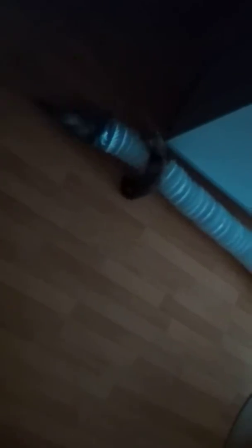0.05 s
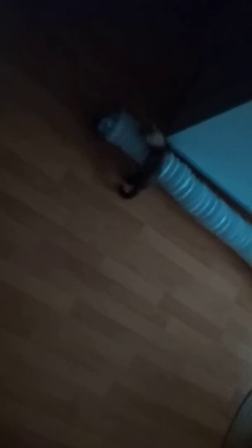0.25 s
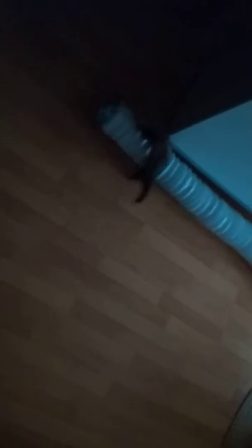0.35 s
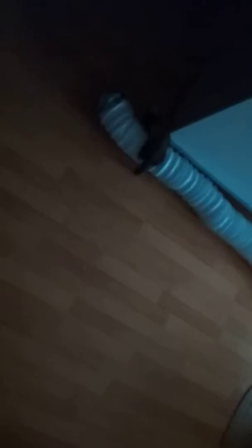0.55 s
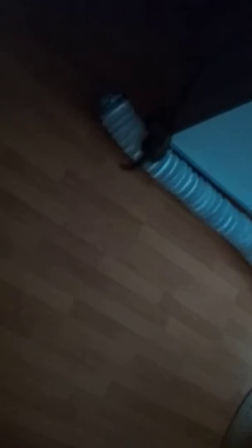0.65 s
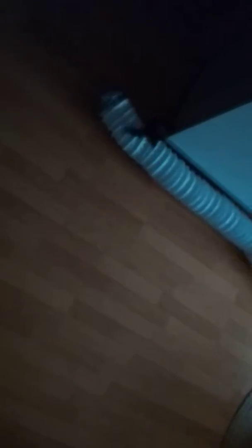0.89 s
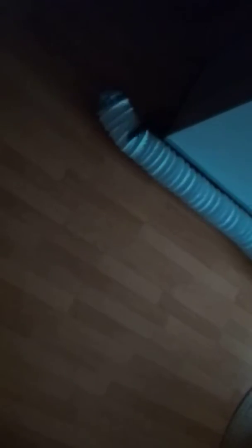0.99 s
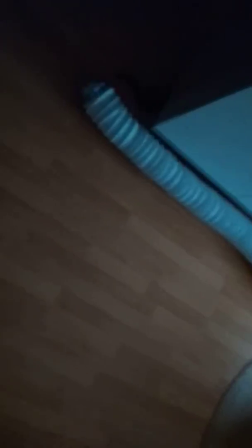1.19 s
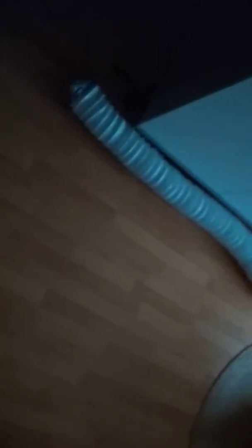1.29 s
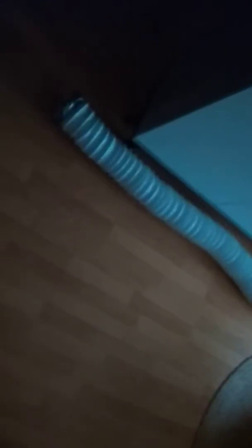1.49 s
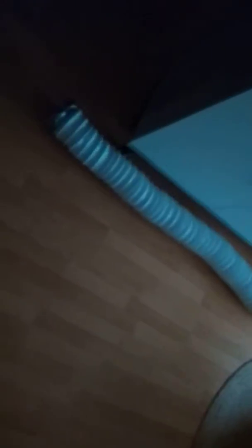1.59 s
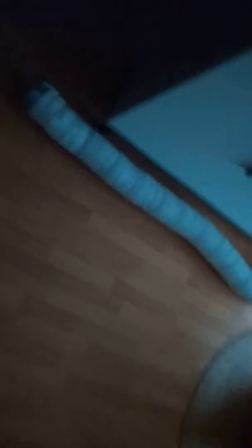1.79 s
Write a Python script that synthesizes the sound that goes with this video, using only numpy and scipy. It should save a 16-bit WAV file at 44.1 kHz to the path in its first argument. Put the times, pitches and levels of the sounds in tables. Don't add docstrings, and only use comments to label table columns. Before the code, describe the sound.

Ferret scrambling inside a flexible plastic tube, hollow knocks and crinkles fading down its length

```python
import sys
import numpy as np
from scipy import signal
from scipy.fft import rfft, irfft, next_fast_len
from scipy.io import wavfile
from scipy.ndimage import uniform_filter1d

SR = 44100
rng = np.random.default_rng(int(sys.argv[2]) if len(sys.argv) > 2 else 0)


def wrap_up_sound(samples):
    columns = np.atleast_2d(samples).T
    tamed = np.clip(columns, -1, 1)
    steps = np.round(tamed * 32767).astype(np.int16)
    wavfile.write(sys.argv[1], SR, steps)


def natural_amplitude(level_db):
    exponent = np.asarray(level_db, float) / 20
    return 10 ** exponent


N = 81585

# t/s, wall crinkle level/dB, tube scuff level/dB, weight on boards level/dB
GALLOP = [(0.0, -94, -88, -90), (.05, -56, -71, -90), (0.117, -57, -83, -90), (0.164, -96, -76, -96),
          (0.242, -98, -47.5, -71), (0.304, -48, -59.5, -52), (0.41, -53, -48, -82),
          (0.556, -51, -49.5, -64), (0.69, -48.5, -48, -52), (.79, -54.5, -49.5, -56),
          (0.844, -56.5, -55, -40), (1.07, -55, -55, -52.5), (1.272, -57.5, -62.5, -68),
          (1.386, -63, -60, -74), (1.468, -62, -81, -100), (1.602, -60.5, -70, -99),
          (1.74, -68.5, -91, -100), (1.85, -113, -96, -101)]


def rms_one(x):
    return x / np.sqrt(np.mean(x ** 2) + 1e-30)


def at_hz(points, hz):
    f, value = np.transpose(points)
    return np.interp(np.log(np.maximum(hz, 1)), np.log(f), value)


def filtered(x, order, hz, kind):
    return signal.sosfilt(signal.butter(order, hz, kind, fs=SR, output="sos"), x)


def colour(x, spectrum):
    size = 4096
    hz = np.arange(size // 2 + 1) * SR / size
    falling_bass = (1, spectrum[0][1] - 60)
    log_gain = at_hz([falling_bass] + list(spectrum), hz) * np.log(10) / 20
    cepstrum = irfft(log_gain)
    cepstrum[1:size // 2] *= 2
    cepstrum[size // 2 + 1:] = 0
    response = irfft(np.exp(rfft(cepstrum)))
    response = response / np.sqrt(np.sum(response ** 2))
    response = response.reshape((1,) * (x.ndim - 1) + (-1,))
    return signal.fftconvolve(x, response, axes=-1)[..., :N]


def ports(size, gain_of_band):
    # f/Hz, likeness (0-1)
    likeness = [(60, 0.97), (250, 0.83), (500, 0.8), (1000, 0.1), (12000, 0.0077)]
    hz = np.arange(size // 2 + 1) * SR / size
    alike = at_hz(likeness, hz)
    mid, side = rfft(rng.standard_normal((2, size)))
    pair = (np.sqrt(1 + alike) * mid + np.sqrt(1 - alike) * side * [[1], [-1]]) / np.sqrt(2)
    out = 0
    for centre in 2 ** np.arange(4, 15.1, 0.5):
        share = np.clip(1 - 2 * np.abs(np.log2(np.maximum(hz, 16) / centre)), 0, 1)
        out = out + irfft(pair * share, size) * gain_of_band(centre)
    return out


def grains(per_s, spread_db, level_db):
    size = natural_amplitude(spread_db * np.minimum(rng.exponential(1, N), 4)) * rng.choice([-1, 1], N)
    happens = rng.random(N) < per_s / SR
    return natural_amplitude(level_db) * rms_one(size * happens)


def swell(turns):
    return np.e * turns * np.exp(-turns)


def ring(hz, cycles, size):
    t = np.arange(size) / SR
    return np.sin(2 * np.pi * hz * t) * swell(t * hz * 9 / np.clip(cycles, 2, 60))


def even(burst):
    spectrum = rfft(burst)
    flat = irfft(spectrum / (uniform_filter1d(np.abs(spectrum), size=50) + 1e-12), len(burst))
    return rms_one(flat) * np.sqrt(np.mean(burst ** 2))


def add(out, s, sound):
    i = int(s * SR)
    out[i:i + len(sound)] += sound[:len(out) - i]


def gallop_level(column):
    table = np.transpose(GALLOP)
    return np.interp(np.arange(N) / SR, table[0], table[column])


def air():
    # f/Hz, level/dB
    hush = [(40, -13), (200, -44.5), (480, -11), (800, -23.5), (2200, -18.5), (5500, -31.5), (9500, -19.5),
            (16000, -30)]
    noise = ports(next_fast_len(N + 1) * 2, lambda hz: 1)[:, :N]
    return natural_amplitude(-71.5) * colour(noise, hush)


def room(x):
    # f/Hz, time/s
    dying_time = [(100, 0.26), (500, 0.39), (2000, 0.31), (8000, 0.27), (15000, 0.25)]
    places, size = 10, 20000
    echo_db, left_db = 6, 0.17
    first_echo_s, build_s = 0.0022, 0.004
    port_lag_s, bounce_s, bounce_db = 0.00029, 0.00083, -3
    t = np.arange(size) / SR
    position = np.arange(N) / N * (places - 1)

    def decay(hz):
        t60 = at_hz(dying_time, hz)
        return natural_amplitude(-60 * t / t60) / np.sqrt(t60)

    out = 0
    for k in range(places):
        tail = ports(size, decay) * (1 - np.exp(-np.maximum(t - first_echo_s, 0) / build_s))
        tail = natural_amplitude(echo_db) * rms_one(tail) / np.sqrt(size)
        lag = (rng.random(2) * port_lag_s * SR).astype(int)
        bounce = (rng.random(2) * bounce_s * SR).astype(int) + 5
        tail[[0, 1], lag] += 1
        tail[[0, 1], lag + bounce] += natural_amplitude(bounce_db)
        here = np.cos(np.pi / 2 * np.clip(position - k, -1, 1))
        out = out + signal.fftconvolve(x[None] * here, tail, axes=1)[:, :N]
    balance = natural_amplitude(left_db * np.array([[1], [-1]]))
    return out * balance / np.sqrt(1 + natural_amplitude(2 * echo_db))


def far_scuff():
    # t/s, level/dB
    far = [
        (1.36, -78),
        (1.44, -59),
        (1.55, -81),
        (1.66, -66),
        (1.76, -64.5),
        (1.85, -96),
    ]
    # f/Hz, level/dB
    pipe = [(500, -23), (780, -3.5), (1100, -49), (1500, 2.5), (1900, -18), (3300, -15.5), (4500, -14.5)]
    s, db = np.transpose(far)
    return colour(grains(900, 3.3, np.interp(np.arange(N) / SR, s, db)), pipe)


def weight():
    # f/Hz, level/dB
    boards = [(25, -24), (55, -12), (80, -19), (105, -4), (150, 0), (230, -2), (400, -12), (1000, -40)]
    return colour(grains(620, 4.4, gallop_level(3) - 10), boards)


def drag():
    # f/Hz, level/dB
    body = [(150, -48.5), (260, -18), (360, 7), (550, -5), (800, 1.5), (1100, -5), (2000, -9),
            (4000, -47.5)]
    return colour(grains(250, 5.0, gallop_level(2) - 0.5), body)


def panels(clicks):
    count, sharpness, swing_db, share = 14, 7.4, 4, 0.63
    dealt = rng.integers(0, count, N)
    out = 0
    for k, hz in enumerate(np.geomspace(1570, 15000, count)):
        bend = np.interp(np.arange(N) / N * 59, np.arange(60), rng.standard_normal(60))
        hits = clicks * natural_amplitude(swing_db * bend) * (dealt == k)
        out = out + signal.lfilter(*signal.iirpeak(hz, sharpness, fs=SR), hits + 1e-18)
    ringing = rms_one(out) * np.sqrt(np.mean(clicks ** 2))
    return np.sqrt(1 - share) * clicks + np.sqrt(share) * ringing


def crinkles():
    # f/Hz, level/dB
    wall = [(530, -34.5), (900, -1), (2190, -13.5), (4150, -15), (4520, -15.5), (5350, -15), (6640, -13.5),
            (11400, -5), (16000, -18.5)]
    return colour(panels(grains(1600, 5, gallop_level(1) - 1.5)), wall)


def paws():
    # t/s, peak level/dB, f/Hz
    landings = [(0.068, -50.5, 218), (0.071, -46.5, 330), (.09, -43, 310), (0.107, -48, 332),
                (0.188, -43.5, 187), (0.201, -43.5, 287), (0.222, -36.5, 362), (0.239, -43.5, 164),
                (.308, -38.5, 320), (0.371, -45, 139), (0.381, -34.5, 311), (0.405, -45, 158),
                (0.45, -40, 130), (0.48, -35.5, 192), (.519, -31.5, 293), (0.541, -40, 385),
                (0.581, -40, 168), (.61, -41.5, 243), (0.67, -41, 205), (0.737, -47, 212),
                (0.792, -36.5, 327), (.839, -34.5, 349), (0.884, -37.5, 157), (0.917, -43.5, 143),
                (0.986, -41, 148), (1.006, -33.5, 337), (1.027, -43, 191), (1.06, -63, 161),
                (1.154, -43, 254), (1.187, -48.5, 173), (1.358, -41, 364), (1.362, -51.5, 252),
                (1.405, -43, 381), (1.45, -56, 370), (1.42, -45, 430), (1.491, -50.5, 420),
                (1.565, -53, 330)]
    cycles, overtone, overtone_db = 7.5, 1.45, -11
    out = np.zeros(N)
    for s, db, hz in landings:
        thump = ring(hz, cycles, 6000) + natural_amplitude(overtone_db) * ring(hz * overtone, cycles, 6000)
        add(out, s, natural_amplitude(db - 4) * filtered(thump, 3, 0.6 * hz, "high"))
    return out


def knocks():
    # t/s, peak level/dB, f/Hz, ring length/cycles, crack level/dB
    hits = [(.044, -61, 2330, 12, -71), (.045, -65.5, 910, 38, -80), (.066, -60, 996, 28, -78),
            (.069, -54.5, 1570, 68, -49.5), (.082, -65.5, 554, 28, -77), (.09, -63, 820, 31, -80),
            (.187, -57, 1670, 7.3, -39), (.232, -43, 790, 8.4, -65), (.25, -44, 580, 8.4, -75),
            (.309, -49.5, 616, 41, -58), (.363, -39, 555, 4.4, -35.5), (.431, -46, 544, 21, -39),
            (.483, -31, 880, 6.9, -53), (.531, -29, 548, 5.3, -34.5), (.516, -36, 476, 4, -54),
            (.572, -39.5, 820, 6.2, -71), (.676, -30, 1660, 3.1, -36.5), (.75, -39.5, 890, 4.3, -38),
            (.841, -31, 534, 3.1, -50), (.992, -36.5, 565, 3.8, -58), (1.093, -47, 530, 7.2, -39),
            (1.153, -38.5, 794, 4.4, -64), (1.304, -49, 610, 13.4, -32.5), (1.305, -52, 915, 9.3, -80),
            (1.32, -54, 1840, 9.3, -43), (1.352, -42, 540, 9, -80), (1.354, -39.5, 780, 13, -40),
            (1.37, -48, 756, 13, -68), (1.479, -44.5, 790, 16.6, -59), (1.496, -53, 436, 11, -82),
            (1.543, -41.5, 780, 10, -35.5), (1.647, -70, 740, 6.4, -48.5), (1.782, -53, 930, 29, -54.5),
            (1.784, -55, 784, 26, -73), (1.783, -51, 1440, 11.6, -80)]
    out, crack = np.zeros(N), np.zeros(N)
    crack_fade = np.exp(-np.arange(3000) / SR / 0.0063)
    for s, db, hz, cycles, crack_db in hits:
        add(out, s, natural_amplitude(db - 1) * ring(hz, cycles, 3000))
        add(crack, s, natural_amplitude(crack_db - 0.5) * even(rng.standard_normal(3000) * crack_fade))
    return out + filtered(crack, 3, [1150, 2500], "band")


def snaps():
    # t/s, peak level/dB, length/ms
    springs = [(.047, -48.5, 15), (0.161, -53.5, 10), (.195, -46.5, 4.6), (0.223, -37.5, 2.8),
               (0.236, -30.5, 0.7), (0.371, -41, 3), (0.4306, -30, 0.5), (0.4321, -31, 0.44),
               (0.4419, -55, 0.56), (0.476, -41.5, 4.5), (.512, -35.5, 3.5), (0.669, -42.5, 5.7),
               (0.712, -45, 0.34), (0.794, -44, 5), (0.8401, -25.5, 0.57), (0.8434, -36.5, 0.83),
               (0.963, -42.5, 4.8), (0.9713, -36.5, .8), (0.992, -31.5, 0.78), (1.092, -48.5, 12),
               (1.147, -39, 6), (1.316, -47.5, 3.4), (1.3517, -27, 0.78), (1.3566, -27.5, 0.7),
               (1.364, -38.5, 1.75), (1.524, -47.5, 1.5), (1.5426, -34.5, 1.6), (1.555, -61, 1.7),
               (1.729, -57.5, 1.1)]
    # f/Hz, level/dB
    rib = [(600, -35), (1000, -2), (2400, -10), (4300, -16.5), (5600, -14.5), (7300, -12.5), (10800, -5),
           (16000, -17)]
    out, t = np.zeros(N), np.arange(3000) / SR
    for s, db, ms in springs:
        shape = swell(1000 * t / np.clip(ms, 0.1, 10))
        add(out, s, natural_amplitude(db - 2) * even(rng.standard_normal(3000) * shape))
    return colour(filtered(out, 1, 1490, "high"), rib)


def scene():
    rubbing = far_scuff() + weight() + drag() + crinkles()
    striking = paws() + knocks() + snaps()
    return air() + room(rubbing + natural_amplitude(3.0) * striking)


def low_pass(x):
    return signal.sosfilt(signal.butter(12, 16640, fs=SR, output="sos"), x)


def record(dry):
    # f/Hz, width/Hz, depth (0-1)
    dips = [(1114, 126, 0.41), (4506, 550, 0.36), (7345, 570, 0.52), (8340, 360, 0.87), (13200, 420, .4)]
    x = filtered(dry, 2, 23.3, "high")
    for hz, width_hz, depth in dips:
        x = x - depth * signal.lfilter(*signal.iirpeak(hz, hz / width_hz, fs=SR), x)
    x = signal.sosfilt(signal.cheby2(10, 60, 17100, fs=SR, output="sos"), x)
    return low_pass(x)


dry = scene()
out = record(dry)
wrap_up_sound(out)
```